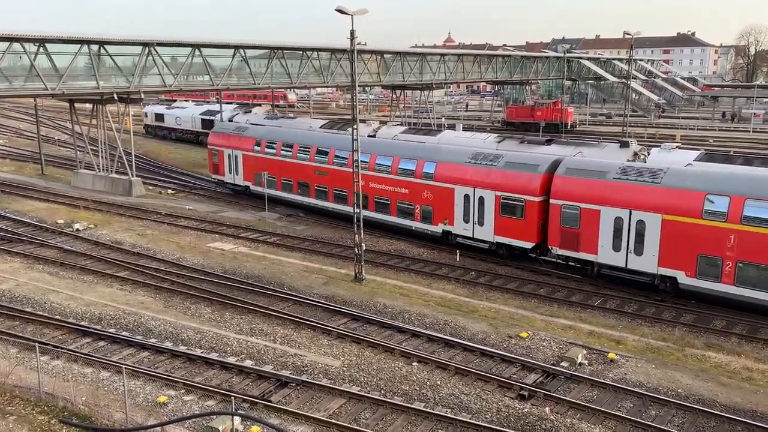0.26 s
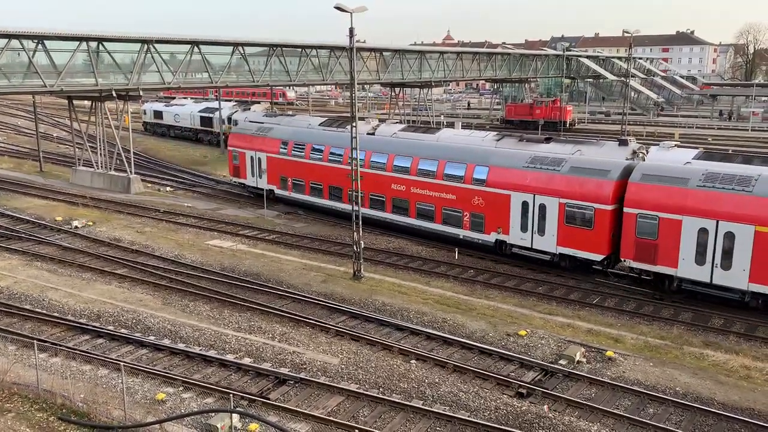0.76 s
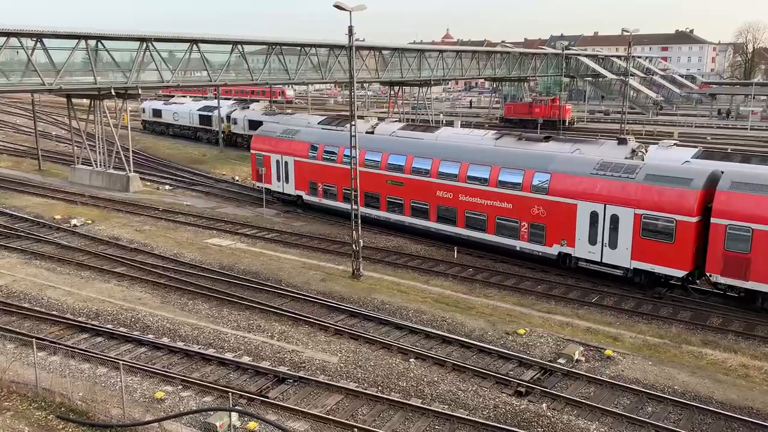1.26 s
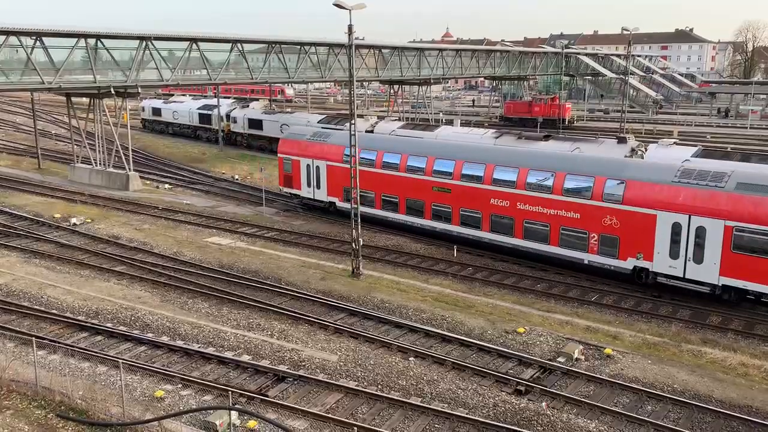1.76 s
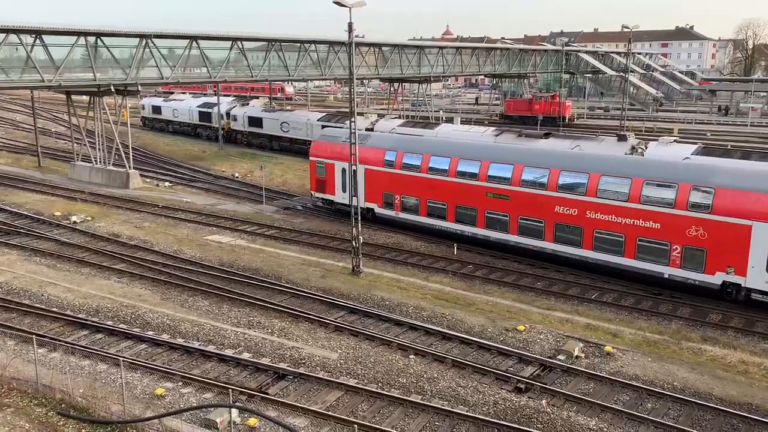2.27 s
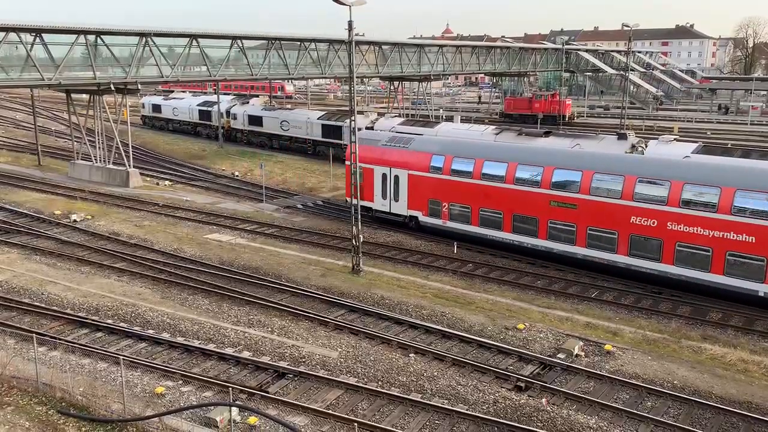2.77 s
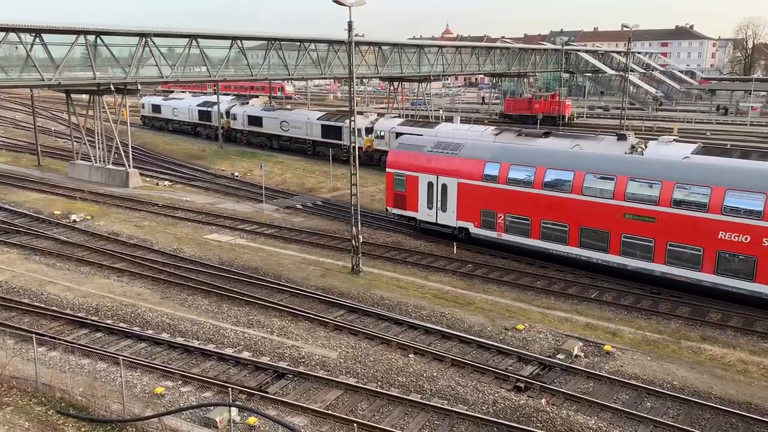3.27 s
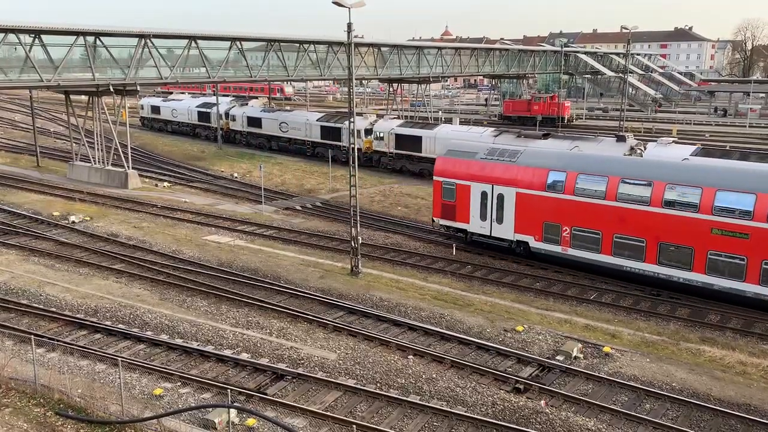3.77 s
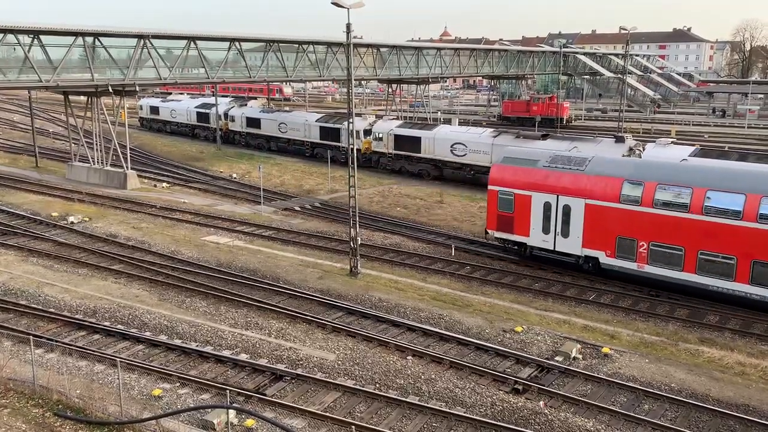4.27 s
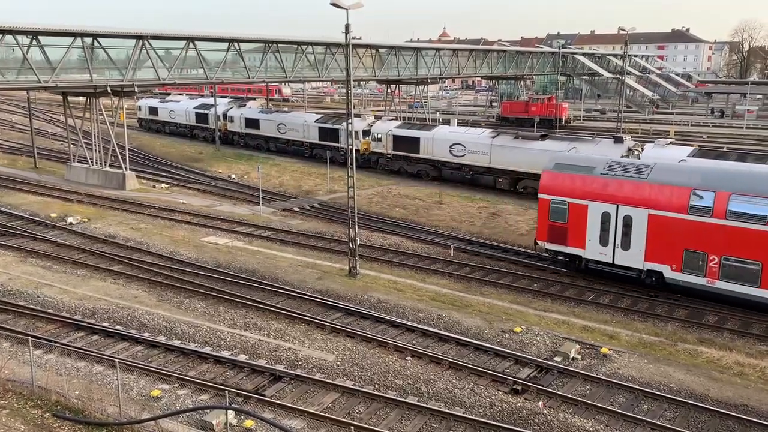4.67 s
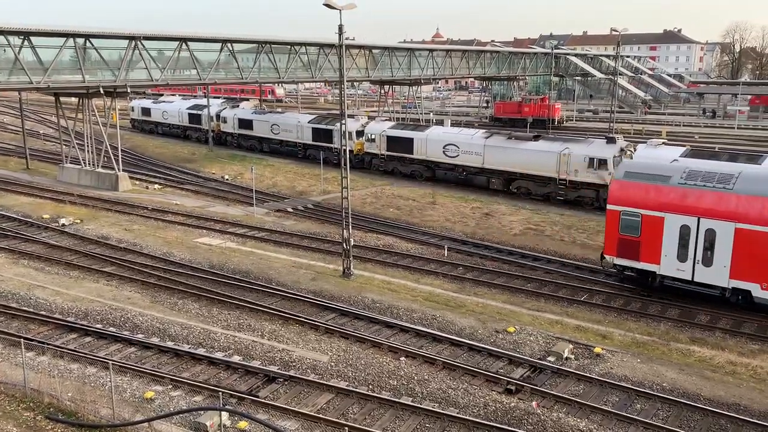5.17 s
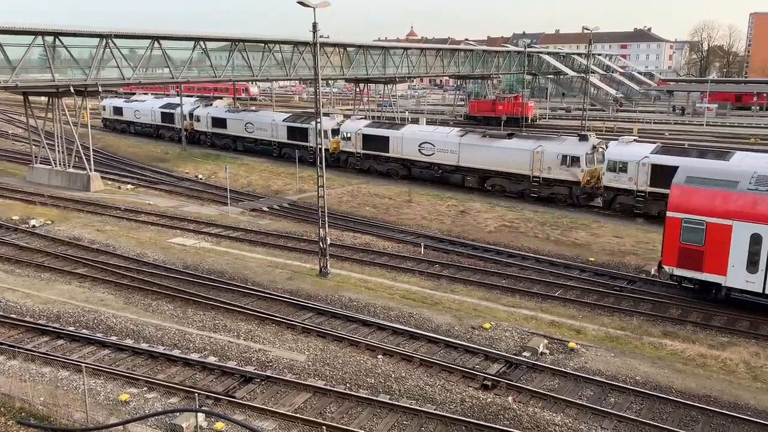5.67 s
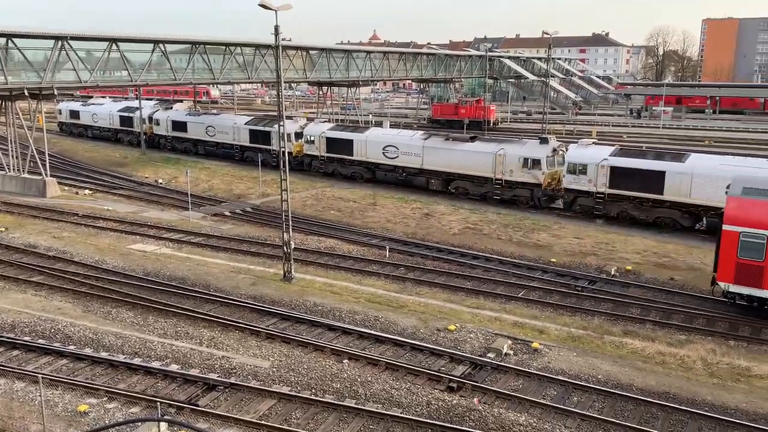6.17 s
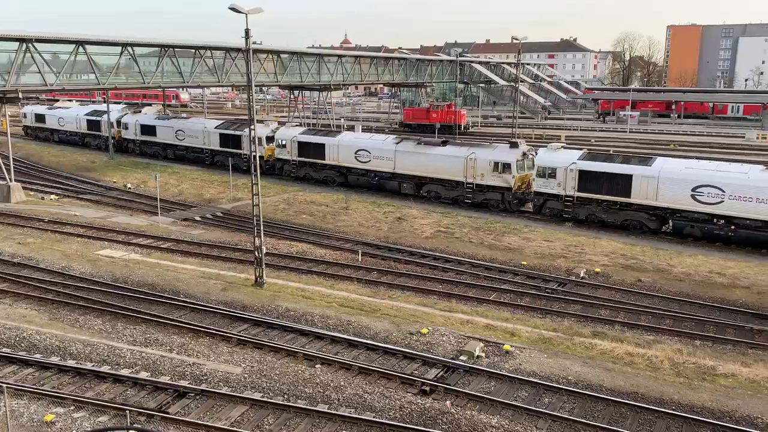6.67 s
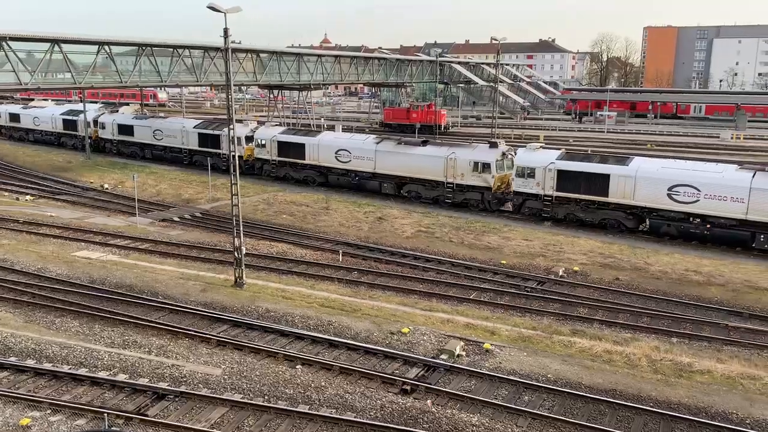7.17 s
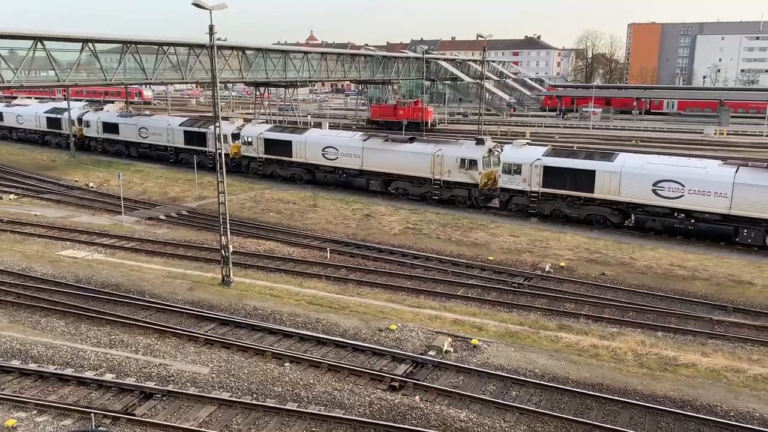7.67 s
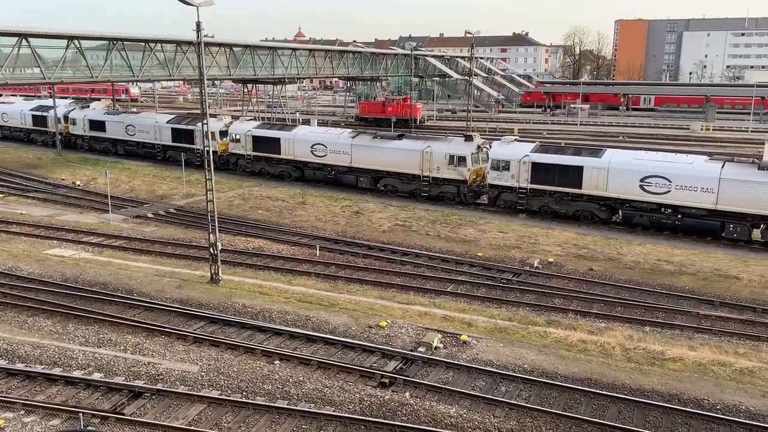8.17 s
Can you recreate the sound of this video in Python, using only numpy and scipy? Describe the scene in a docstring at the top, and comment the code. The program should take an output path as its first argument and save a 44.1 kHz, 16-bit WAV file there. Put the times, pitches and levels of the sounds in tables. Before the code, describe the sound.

A slow train crosses yard points, captured by a stereo microphone at a distance in open air. Bogies thump dully, rails hum, wheels roar and ring quietly over a low engine throb. A brief rough groan precedes two pairs of loud steel knocks, each with a boomy thud and a short scrape. A quieter gap follows, with a tiny close snap, then a final pair of knocks before rolling noise softens and idling engines hum and whirr.

```python
"""A rail yard, heard from above and some way off, as a double-deck train rolls slowly through.
Locomotives underneath drone and hum as coloured noise; their machinery comes forward with the last coach.
Bogies jolt in the points as blows of noise; wheels rumble, roar, hiss and ring as shaped noise.
Each bogie knocks twice over a joint: noise cracks and scrapes, with sine thuds and ringing wheel modes.
Flanges chirp and tick as noise and groan as rough tones; small dry snaps of noise sit near the microphone."""
import sys
import numpy as np
from scipy import signal
from scipy.fft import rfft, irfft, next_fast_len
from scipy.io import wavfile
from scipy.ndimage import uniform_filter1d

SR = 44100
rng = np.random.default_rng(int(sys.argv[2]) if len(sys.argv) > 2 else 0)


def file_out(sig):
    """Save sig as 16-bit WAV at sys.argv[1]."""
    # one column per channel
    cols = np.atleast_2d(sig).T
    # limit, then scale
    lim = np.clip(cols, -1, 1)
    pcm = np.round(lim * 32767).astype(np.int16)
    wavfile.write(sys.argv[1], SR, pcm)


N = 370876
TIME = np.arange(N) / SR
SIZE = next_fast_len(N, True)
BINS = np.maximum(np.arange(SIZE // 2 + 1) * SR / SIZE, 1)  # Hz

# Levels are relative: the functions add trims, wavering and coloured noise.
# Two microphone ports: their spacing, the share and lead of sound straight from the right,
# and the greatest likeness of the two signals
PORT_SPACING_M, DIRECT_SHARE, RIGHT_LEAD_S, PORT_LIKENESS = .125, .16, .00021, .93
SOUND_SPEED_M_PER_S = 343
STEEL_RIPPLE_DB = 2.2
CUTOFF_HZ = 15900
# balance of the ports: pitch_hz, left_minus_right_db
PORT_BALANCE = [(40, 2), (130, 5), (260, 1.5), (520, 5), (1000, 3.5), (2000, 3), (4500, 1.5), (12000, -1.5)]

# diesel drone: steady level, depth and rate of its wavering, half-length of a swell
DRONE_DB, WAVER_DB, WAVER_HZ, SWELL_S = -37, 0.7, 4.4, 0.079
# swells of the drone: peak_s, rise_db
DRONE_SWELLS = [(1.44, 6), (3.04, 7), (6.96, 5), (7.39, 4)]
# exhaust drone spectrum: pitch_hz, density_db_per_hz
DRONE_COLOUR = [(12, -69.5), (22, -40.5), (30, -15), (40, -2), (50, 9.5), (66, 7.5), (80, 4), (110, -28.5),
                (200, -76.5), (1000, -110)]
# locomotive machinery, uncovered by the last coach: time_s, level_db
MACHINERY_LEVELS = [(0, -63), (5, -46), (7.2, -42), (8.41, -41)]
# its hum and whirr: pitch_hz, density_db_per_hz
MACHINERY_COLOUR = [(180, -28), (262, -1), (370, -27.5), (750, -32.5), (1050, -22.5), (1300, -34),
                    (1403, -22.5), (1500, -34), (2000, -37.5), (2100, -26), (2200, -36), (8000, -79.5)]

# the track hums under a passing load: start_s, level_db, t60_s
TRACK_HUMS = [(.415, -23.5, .3), (2.58, -28, 0.47), (3.69, -38, .25), (4.819, -25.5, 0.56),
              (5.125, -33, 0.14)]

# dull bumps of the bogies in the points, and rebounds just after some joint blows: start_s, body_boom_db,
# frame_clunk_db, t60_s
BOGIE_BUMPS = [(0.101, -24.5, -45, 0.99), (.285, -25, -42, 0.23), (.415, -29, -36.5, 0.66),
               (1.099, -29, -44, 0.4), (1.168, -37, -31, 0.53), (1.955, -28, -53, 0.25),
               (2.063, -18, -35, 0.12), (2.203, -39, -23, 0.12), (2.232, -18, -25.5, 0.097),
               (2.47, -30.5, -30, 0.39), (2.575, -35, -36, 0.41), (2.787, -23.5, -28, 0.31),
               (3.19, -15, -29, 0.077), (3.335, -15.5, -32, 0.091), (3.719, -24, -48, 0.11),
               (4.821, -37, -36.5, 0.42), (4.875, -41, -35, 0.35), (5.112, -46, -36, 0.16),
               (5.94, -33, -53, .4), (6.6, -23, -37, 0.15), (6.862, -34, -33, 0.11)]
# weaker jolts at random between them
JOLTS_PER_S, JOLT_BOOM_DB, JOLT_CLUNK_DB, JOLT_SPREAD_DB, JOLT_T60_S = 1, -33.5, -39, 5, 0.13
# coach body boom: pitch_hz, density_db_per_hz
BOOM_COLOUR = [(60, -19.5), (125, 8.5), (175, 12), (240, -1.5), (320, -8), (700, -57.5), (3000, -100)]
# bogie frame clunk: pitch_hz, density_db_per_hz
CLUNK_COLOUR = [(150, -17), (320, -9), (450, -2), (600, -6), (900, -19.5), (2000, -43), (6000, -53),
                (10000, -98.5)]

# rolling wheels: time_s, rumble_db, roar_db, rail_hiss_db
ROLLING_LEVELS = [(0.0, -34, -39, -52.5), (0.37, -33, -36.5, -50), (0.61, -35, -36.5, -52),
                  (1.64, -31.5, -36, -49.5), (3.32, -31.5, -38.5, -50), (4.14, -32.5, -38, -54),
                  (4.66, -35, -38.5, -55), (6.44, -32.5, -40, -54.5), (7.3, -34, -40, -56),
                  (8.41, -34.5, -42.5, -57)]
# ring of the rolling wheels: time_s, level_db
RING_LEVELS = [(0, -41), (1.6, -60), (3.0, -42), (4.0, -45.5), (5.2, -46), (6.4, -46), (7.3, -53.5),
               (8.41, -52)]
# rumble of sleepers and coach bodies: pitch_hz, density_db_per_hz
RUMBLE_COLOUR = [(50, -19.5), (80, -3), (105, 1.5), (135, -1.5), (190, 0.5), (222, -3.5), (256, 4.5),
                 (282, -1.5), (320, -6.5), (400, -18.5), (600, -27), (1200, -107.5), (4000, -110)]
# roar of the rails: pitch_hz, density_db_per_hz
ROAR_COLOUR = [(200, -13.5), (330, 1.5), (440, 1.5), (620, -2.5), (830, -4), (1000, -9), (1300, -13.5),
               (1700, -17.5), (2300, -20), (3200, -33), (6000, -78), (9000, -82.5)]
# hiss of the rails: pitch_hz, density_db_per_hz
HISS_COLOUR = [(900, -26.5), (1800, 2), (2450, 3.5), (2700, 13.5), (3100, 5), (3370, 10.5), (3750, 2),
               (4100, 7), (4900, 3), (5600, -4.5), (7000, -5.5), (8200, -38), (10300, -12), (12000, -22.5),
               (13200, -47), (15000, -33.5), (16000, -42.5)]
# wheel and rail modes excited by rolling: pitch_hz, width_hz, level_db
ROLLING_MODES = [(445, 12, 2), (570, 20, 0), (698, 14, 2.5), (780, 22, 1), (850, 16, 0), (1403, 20, -5.5),
                 (1565, 25, -11), (2095, 60, -4.5), (2620, 14, -14.5), (3370, 30, -21)]

# flanges chirp on the rail head: start_s, level_db, rub_s
FLANGE_CHIRPS = [(0.424, -67, 0.012), (0.896, -65, 0.023), (1.048, -50, 0.051), (1.465, -67, 0.066),
                 (1.772, -57, .01), (2.155, -62, .02), (6.963, -74, 0.023)]
CHIRP_ATTACK_S, CHIRP_T60_S = 0.0072, 0.29
# flange squeal modes: pitch_hz, width_hz, level_db
SQUEAL_MODES = [(9900, 450, -3), (10345, 40, 9), (10570, 55, 5.5), (10600, 330, 4), (10860, 14, 0),
                (14400, 500, -13)]
# a wheel groans in the curve: peak_s, pitch_hz, glide_hz_per_s, roughness_hz, level_db, half_length_s
WHEEL_GROANS = [(.35, 1780, -100, 60, -57, .045), (1.18, 1130, 0, 90, -51.5, .035),
                (1.228, 1428, -350, 30, -51.5, .07), (1.3, 1105, -300, 75, -46.5, .04),
                (1.38, 1150, 0, 160, -49.5, .07), (2.81, 4750, 0, 260, -54, .016),
                (3.715, 6200, 0, 550, -68, .035), (5.9, 4700, 0, 900, -68, .1)]
# light ticks of the running gear: start_s, level_db
GEAR_TICKS = [(1.035, -51.5), (1.462, -53.5), (2.312, -58.5), (2.668, -63), (3.208, -58), (3.69, -61)]
# the leading wheel ticks again past the joint, at a level against its crack;
# the gently rising speed sets the delay
TICK_PAST_JOINT_M, LATE_TICK_DB = 1.11, -23
SPEED_M_PER_S, GAIN_M_PER_S2 = 5.93, .0367

# dry snaps near the microphone: start_s, level_db
DRY_SNAPS = [(5.2944, -34.5), (7.302, -52)]
# their spectrum: pitch_hz, density_db_per_hz
SNAP_COLOUR = [(200, 8), (900, 14), (2500, 7), (3800, 9), (6000, -2), (8500, -11), (11000, -1),
               (13000, -13), (15500, -16)]

# axles cross the joint, two to a bogie:
# start_s, crack_db, thud_db, thud_hz, scrape_db, wheel_ring_db
AXLES = [(1.77, -36.5, -18.5, 236, -43, -49), (2.1865, -34.5, -18, 245, -44, -47),
         (2.8935, -34.5, -16.5, 252, -45, -38), (3.3075, -34.5, -16, 252, -46.5, -38),
         (6.1805, -33.5, -14.8, 262, -42, -40.5), (6.5858, -36.5, -16.5, 262, -46, -41)]
# first touch of wheel on rail end: pitch_hz, density_db_per_hz
IMPACT_COLOUR = [(700, -20), (2000, 0), (3000, 0), (3700, -12), (8500, -38), (10500, -26), (16000, -50)]
# crack of steel on steel: pitch_hz, density_db_per_hz
CRACK_COLOUR = [(120, -4.5), (300, 8), (500, 10.5), (900, 13.5), (1300, -13), (2000, -5.5), (2700, -3),
                (3500, -11), (5000, -17), (7000, -20.5), (8500, -52.5), (16000, -35)]
# scrape of tread or flange on rail: pitch_hz, density_db_per_hz
SCRAPE_COLOUR = [(1000, -35), (2700, -8), (3600, 9), (5000, 4), (7000, 1.5), (8300, -28), (9400, -2),
                 (10300, 7.5), (11800, -10), (13300, -14), (14800, -10.5), (16000, -21)]
# damped rail resonances of a blow: pitch_hz, width_hz, level_db
CLACK_MODES = [(430, 50, 2), (560, 70, 0), (860, 55, 0), (1340, 45, -5)]
# damped wheel resonances of a blow: pitch_hz, width_hz, level_db
CLANG_MODES = [(2130, 35, 0), (2620, 25, -3), (2780, 90, -1), (2970, 40, -2), (3450, 50, -9),
               (4020, 70, -12)]
# against each crack: its clack, its clang and its broadband part
CLACK_DB, CLANG_DB, BODY_DB = -0.5, -13, -5
# modes of a struck wheel: pitch_hz, level_db, t60_s
STRUCK_MODES = [(470, 3, .2), (861, 2, .3), (1110, -6, .2), (1350, -4, .22), (1556, -4, .3),
                (2100, -8, .55), (2130, -5, .3), (2616, -4.5, .85), (2630, -5.5, .6), (2720, -10, .25),
                (2995, -9, .3), (3380, -13, .6), (4030, -17, .35), (4985, -21, .4), (5975, -25, .3),
                (10330, -25, .25)]


def from_db(db):
    """Decibels to gain."""
    return 10 ** (np.asarray(db) / 20)


def in_time(rows):
    """Each column of a level table, interpolated at every sample."""
    time_s, *columns = np.transpose(rows)
    return [np.interp(TIME, time_s, column) for column in columns]


def colour(points):
    """Gain at every frequency from a spectrum, interpolated over log frequency."""
    hz, db = np.transpose(points)
    return from_db(np.interp(np.log(BINS), np.log(hz), db))


def resonances(modes):
    """Gain of a set of steep-sided modes; a mode's power does not depend on its width."""
    return sum(from_db(db) / np.sqrt(width) / (1 + ((BINS - hz) / width) ** 2) for hz, width, db in modes)


def drift(rate):
    """Random wavering with spread 1, mostly slower than the rate in Hz."""
    slow = irfft(rfft(rng.standard_normal(SIZE)) / (1 + (BINS / rate) ** 2), SIZE)[:N]
    return slow / slow.std()


def fading(rate, depth):
    """Complex gain of a steady part plus random drift; rms 1."""
    return (1 + depth * (drift(rate) + 1j * drift(rate))) / np.sqrt(1 + 2 * depth ** 2)


def noise(gain, ripple_db=1.0, direct=DIRECT_SHARE, lead=RIGHT_LEAD_S):
    """Coloured noise at the two ports, rippled as by many small steel modes; their mean has rms 1."""
    ripple = signal.fftconvolve(rng.standard_normal(len(BINS)), np.hanning(701), "same")
    ripple_depth = ripple_db * np.minimum(BINS / 2000, 1)
    gain = gain * from_db(ripple_depth * ripple / ripple.std())
    diffuse = np.sinc(2 * BINS * PORT_SPACING_M / SOUND_SPEED_M_PER_S)  # long waves reach both alike
    straight = np.exp(2j * np.pi * BINS * lead)
    alike = PORT_LIKENESS * ((1 - direct) * diffuse + direct * straight)
    left, own = rfft(rng.standard_normal((2, SIZE))) * gain / np.sqrt(1 + alike.real)
    right = alike * left + np.sqrt(np.maximum(1 - abs(alike) ** 2, 0)) * own
    lean = np.sqrt(colour(PORT_BALANCE))
    pair = irfft(np.array([left * lean, right / lean]), SIZE)[:, :N]
    return pair / pair.mean(axis=0).std()


def from_joint(gain):
    """Noise that comes mostly straight from the joint, almost ahead."""
    return noise(gain, STEEL_RIPPLE_DB, direct=.68, lead=.00002)


def from_flange(gain):
    """Noise that comes mostly straight from the wheel's contact with the rail."""
    return noise(gain, STEEL_RIPPLE_DB, direct=.82, lead=-.00001)


def steady(pair, seconds):
    """Evens out the slow swells of a narrow noise by its running power."""
    power = uniform_filter1d(pair.mean(axis=0) ** 2, int(seconds * SR))
    return pair / np.sqrt(np.maximum(power, 0) + 1e-9)


def blows(times, levels_db, rise, t60):
    """Envelope of blows that swell quickly and die away, each at most a second long."""
    out = np.zeros(N)
    for s, db in zip(times, levels_db):
        start = int(max(s, 0) * SR)
        age = TIME[:min(SR, N - start)]
        decay = from_db(db - 60 * age / t60)
        out[start:start + len(age)] += decay * (1 - np.exp(-age / rise))
    return out


def diesels():
    """Exhaust drone of the locomotives: low noise, wavering slowly and swelling now and then."""
    swell_db = sum(db * np.exp(-((TIME - s) / SWELL_S) ** 2) for s, db in DRONE_SWELLS)
    level = from_db(DRONE_DB + WAVER_DB * drift(WAVER_HZ) + swell_db)
    return level * steady(noise(colour(DRONE_COLOUR)), seconds=0.18)


def machinery():
    """Hum and whirr of the locomotives: peaked noise that grows as the last coach uncovers it."""
    level_db, = in_time(MACHINERY_LEVELS)
    return from_db(level_db) * noise(colour(MACHINERY_COLOUR))


def track():
    """The loaded track swings at its own resonance: bursts of narrow noise."""
    swing = sum(blows([s], [db], rise=.005, t60=t60) for s, db, t60 in TRACK_HUMS)
    return swing * steady(noise(resonances([(252, 23, 0)])), seconds=.05)


def jolts():
    """Weak jolts at random moments, as rows like those of the bumps."""
    chances = rng.random((40, 3))
    times = np.cumsum(-np.log(1 - chances[:, 0])) / JOLTS_PER_S
    spreads_db = JOLT_SPREAD_DB * (2 * chances[:, 1:] - 1)
    return [(s, JOLT_BOOM_DB + boom, JOLT_CLUNK_DB + clunk, JOLT_T60_S)
            for s, (boom, clunk) in zip(times, spreads_db) if s < TIME[-1]]


def bumps():
    """Bogies jolt through the points and rebound after some joint blows: the coach body booms and the frame
    clunks."""
    rows = BOGIE_BUMPS + jolts()
    boom = sum(blows([s], [db], rise=0.0037, t60=t60) for s, db, _, t60 in rows)
    clunk = sum(blows([s], [db], rise=0.0011, t60=t60) for s, _, db, t60 in rows)
    body = boom * steady(noise(colour(BOOM_COLOUR)), seconds=0.036)
    frame = clunk * steady(noise(colour(CLUNK_COLOUR)), seconds=0.018)
    return body + frame


def snaps():
    """Small dry snaps near the microphone: short noise, with a brief rustle after each."""
    s, db = np.transpose(DRY_SNAPS)
    snap = blows(s, db, rise=.0005, t60=.02)
    rustle = blows(s + 0.0026, db - 7.0, rise=0.0032, t60=0.085)
    return (snap + rustle) * noise(colour(SNAP_COLOUR))


def speed(s):
    """Speed of the train in metres a second."""
    return SPEED_M_PER_S + GAIN_M_PER_S2 * s


def chirps():
    """Envelope of the flange chirps: each swells, holds while the flange rubs, and rings out."""
    out = np.zeros(N)
    for s, db, rub in FLANGE_CHIRPS:
        age = np.maximum(TIME - s, 0)
        decay_db = 60 * np.maximum(age - rub, 0) / CHIRP_T60_S
        out += from_db(db - decay_db) * (1 - np.exp(-age / CHIRP_ATTACK_S))
    return out


def groans():
    """A wheel groans and rasps in the curve: gliding tones roughened by an unsteady grip."""
    out = np.zeros(N)
    for s, hz, glide, rough_hz, db, length in WHEEL_GROANS:
        grip = fading(rate=rough_hz, depth=3)
        turns = np.cumsum(hz + glide * (TIME - s)) / SR
        tone = (grip * np.exp(2j * np.pi * turns)).real
        out += from_db(db + 8.0) * np.exp(-((TIME - s) / length) ** 2) * tone
    return out


def flanges():
    """Flanges stick and slip on the rail: thin chirps, a few rough groans, light ticks."""
    late = [(s + TICK_PAST_JOINT_M / speed(s), db + LATE_TICK_DB) for s, db, *_ in AXLES[::2]]
    chirp = chirps() * from_db(1.8 * drift(rate=50)) * from_flange(resonances(SQUEAL_MODES))
    tick = blows(*np.transpose(GEAR_TICKS + late), rise=0.0015, t60=0.26)
    return chirp + groans() + tick * noise(colour(SCRAPE_COLOUR), ripple_db=STEEL_RIPPLE_DB)


def rolling():
    """Rough steel shakes sleepers and coach bodies, the rails roar and hiss, the wheels ring."""
    rumble_db, roar_db, hiss_db = in_time(ROLLING_LEVELS)
    ring_db, = in_time(RING_LEVELS)
    tread = drift(rate=11.0)  # uneven tread shakes rumble, roar and hiss together
    rumble_gain = from_db(rumble_db + 1.55 + 1.27 * tread)
    rumble = rumble_gain * steady(noise(colour(RUMBLE_COLOUR)), seconds=0.27)
    roar = from_db(roar_db + 0.29 + 0.75 * tread) * noise(colour(ROAR_COLOUR))
    grit = .5 * tread + .4 * drift(rate=70)
    hiss = from_db(hiss_db - 5.0 + grit) * noise(colour(HISS_COLOUR))
    ring = from_db(ring_db - 0.5 + 2.2 * drift(rate=10.0)) * noise(resonances(ROLLING_MODES))
    return rumble + roar + hiss + ring


def thuds(knock_hz, knock_t60, knock_db, lag, swell):
    """A wheel drops off the rail end with a knock; the track then swings up and dies away."""
    out = np.zeros(N)
    age = TIME[:SR // 2]
    for s, crack_db, thud_db, hz, *_ in AXLES:
        start = int(s * SR)
        knock_gain = from_db(crack_db + knock_db - 60 * age / knock_t60)
        knock = knock_gain * np.sin(2 * np.pi * knock_hz * age)
        growth = np.maximum(age - lag, 0) / swell
        swing_gain = from_db(thud_db) * growth * np.exp(1 - growth)
        swing = swing_gain * np.sin(2 * np.pi * hz * (age - lag))
        out[start:start + len(age)] += knock + swing
    return out * from_db([[1.0], [-1.0]])  # a little to the left


def struck_wheels():
    """Each blow sets the wheel's modes ringing; each mode fades in its own way at each port."""
    out, age = np.zeros((2, N)), TIME[:SR]
    paths = fading(rate=24, depth=.8)
    contact = 1 - np.exp(-age / 0.0027)  # the contact builds up over a few milliseconds
    for s, *_, ring_db in AXLES:
        start = int(s * SR)
        for hz, db, t60 in STRUCK_MODES:
            strength = from_db(ring_db + db - 60 * age / t60)
            own = paths[rng.integers(0, N - SR, (2, 1)) + np.arange(SR)]
            tone = (own * np.exp(2j * np.pi * (hz * age + rng.random()))).real
            out[:, start:start + SR] += contact * strength * tone
    return out


def joints():
    """Steel cracks on steel, the tread lands on the next rail with a scrape, and the yard scatters it back."""
    s, crack_db, thud_db, _, scrape_db, _ = np.transpose(AXLES)
    crack = blows(s, crack_db + 7, rise=.0007, t60=.15)
    impact = blows(s, crack_db - 1, rise=.0005, t60=.085) * from_joint(colour(IMPACT_COLOUR))
    scatter = blows(s + 0.019, crack_db, rise=0.029, t60=0.82)
    landing = blows(s + 0.01, scrape_db + 5.5, rise=.0005, t60=.04)
    scrape = blows(s + 0.019, scrape_db + 6.5, rise=0.041, t60=0.19)
    afterswing = blows(s + .058, thud_db - 8, rise=.01, t60=.17)
    clank = (from_db(BODY_DB) * crack + scatter) * from_joint(colour(CRACK_COLOUR))
    for modes, db in (CLACK_MODES, CLACK_DB), (CLANG_MODES, CLANG_DB):
        clank += from_db(db) * crack * steady(from_joint(resonances(modes)), seconds=0.038)
    rough_scrape = scrape * from_db(1.1 * drift(rate=180))
    bright = (landing + rough_scrape) * from_flange(colour(SCRAPE_COLOUR))
    boom = afterswing * steady(noise(resonances([(262.0, 16, 0)])), seconds=0.14)
    thud = thuds(knock_hz=295, knock_t60=.08, knock_db=16.5, lag=.012, swell=.0105)
    return impact + clank + bright + boom + thud + struck_wheels()


def scene():
    """The passing train over the drone of the yard."""
    yard = diesels() + machinery() + track()
    train = bumps() + flanges() + rolling() + joints()
    return yard + snaps() + train


def record(dry):
    """The microphone's top end is cut steeply by an elliptic low-pass."""
    steep = signal.ellip(10, .1, 90, CUTOFF_HZ, fs=SR, output="sos")
    return signal.sosfilt(steep, dry)


dry = scene()
out = record(dry)
file_out(out)
```